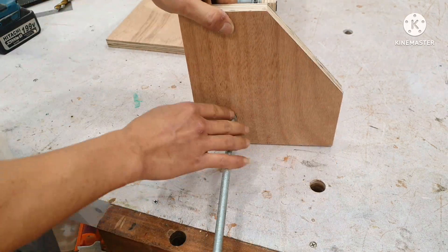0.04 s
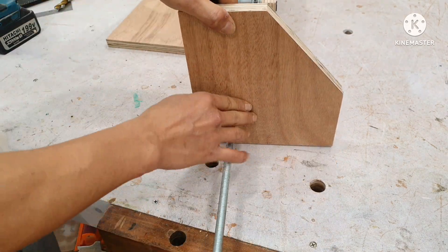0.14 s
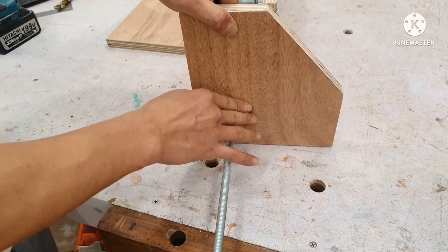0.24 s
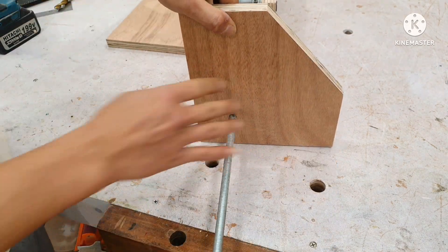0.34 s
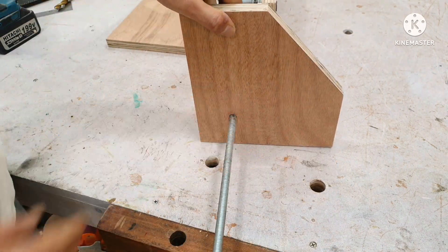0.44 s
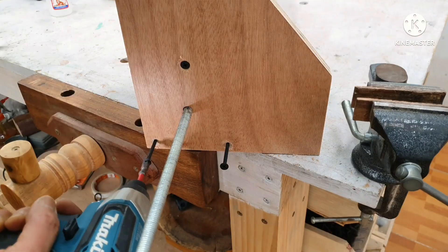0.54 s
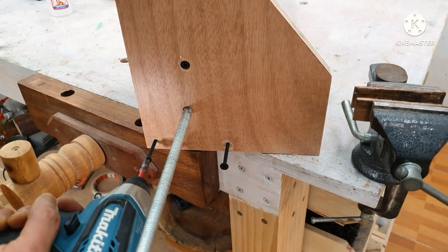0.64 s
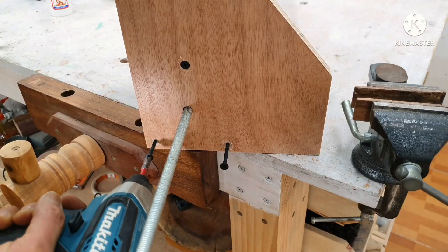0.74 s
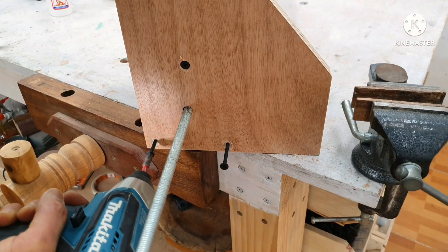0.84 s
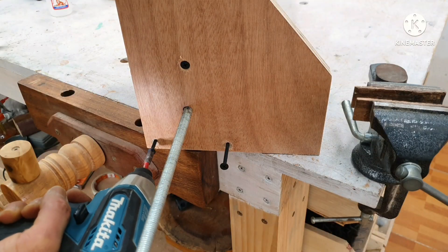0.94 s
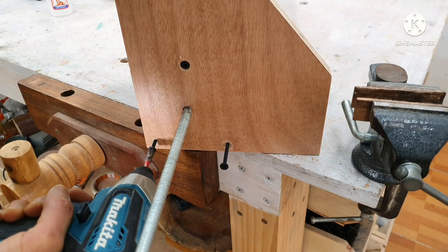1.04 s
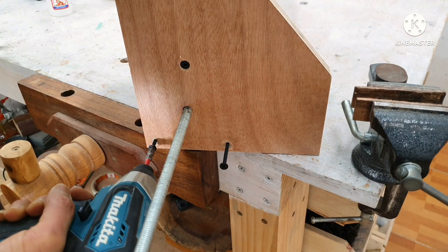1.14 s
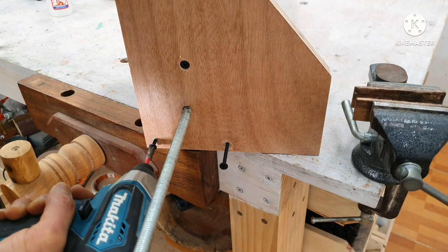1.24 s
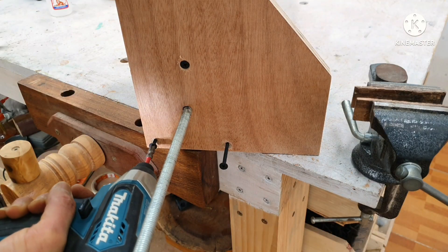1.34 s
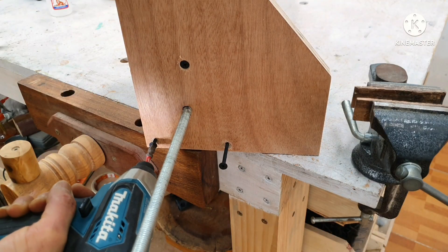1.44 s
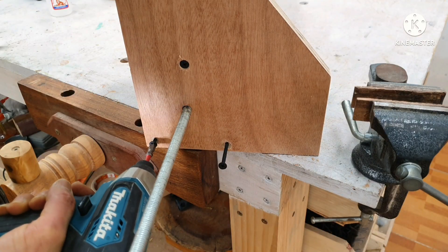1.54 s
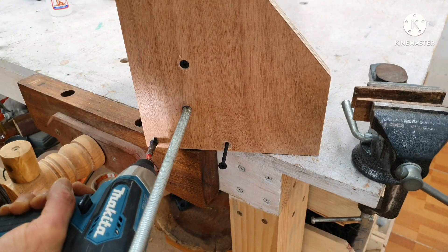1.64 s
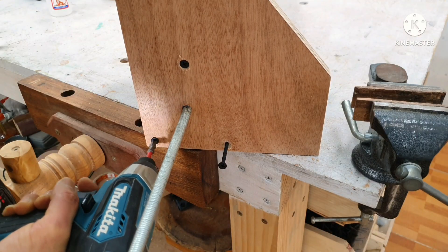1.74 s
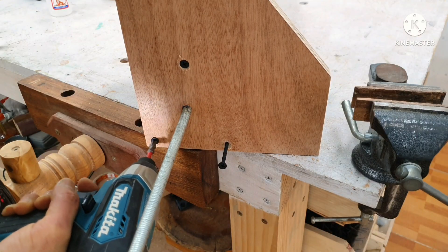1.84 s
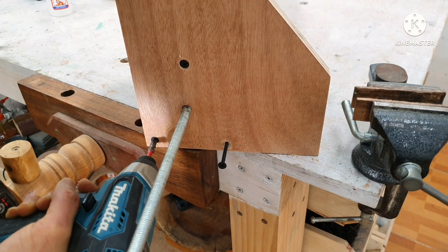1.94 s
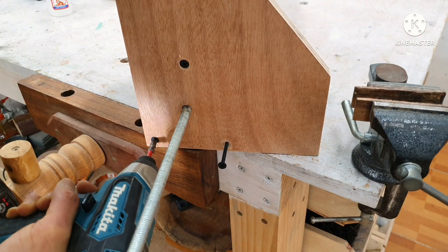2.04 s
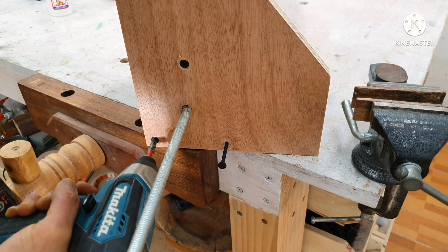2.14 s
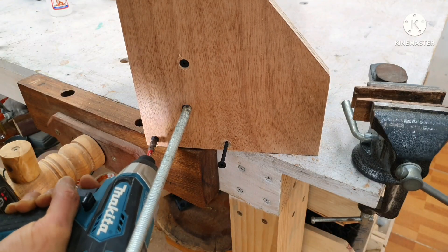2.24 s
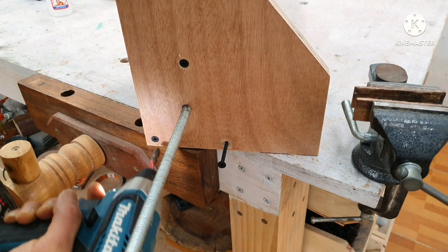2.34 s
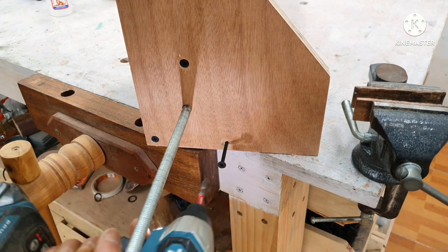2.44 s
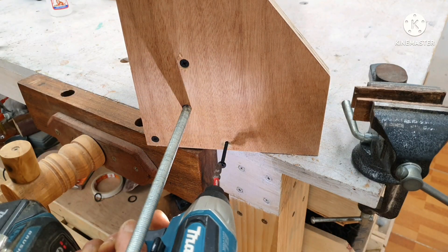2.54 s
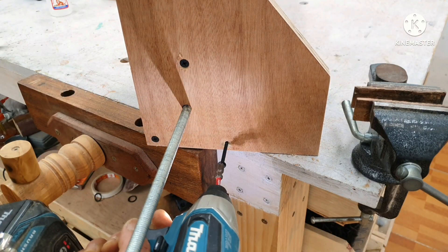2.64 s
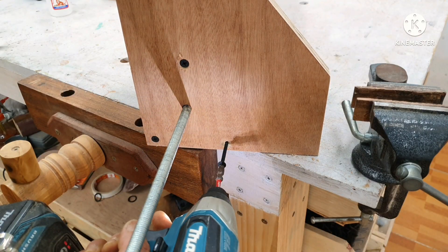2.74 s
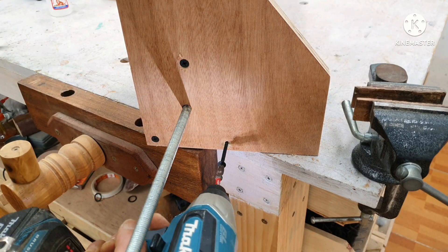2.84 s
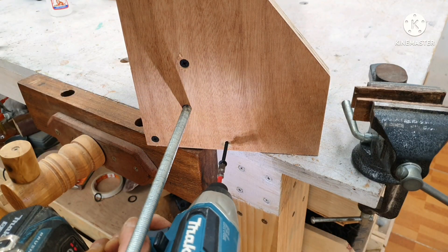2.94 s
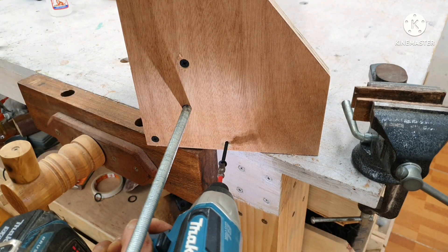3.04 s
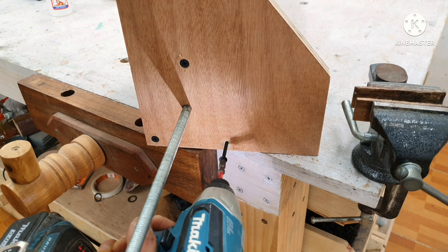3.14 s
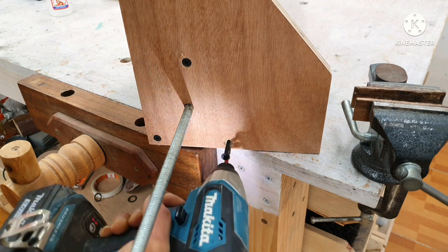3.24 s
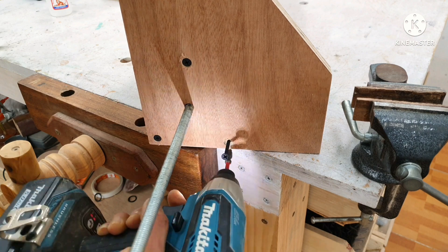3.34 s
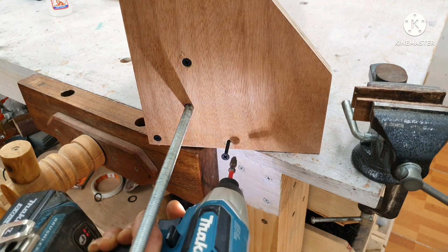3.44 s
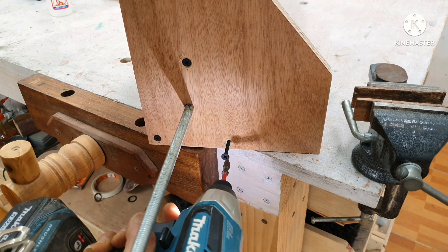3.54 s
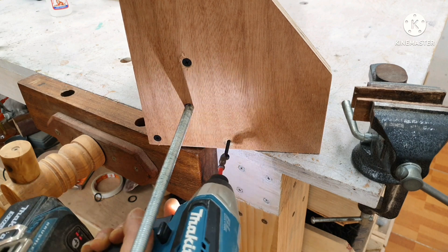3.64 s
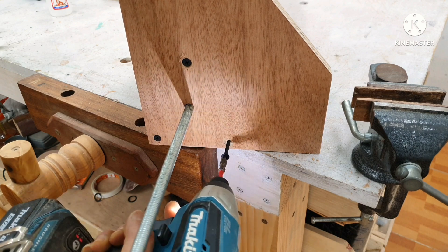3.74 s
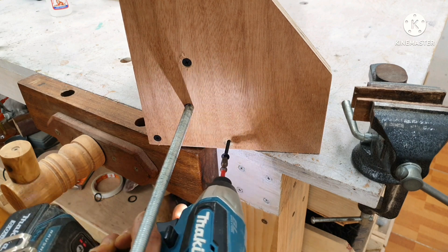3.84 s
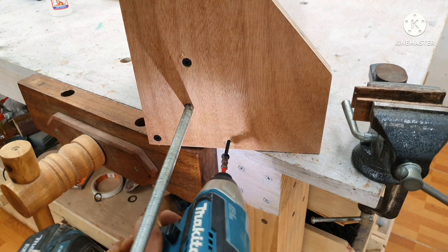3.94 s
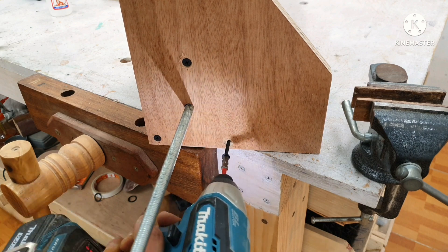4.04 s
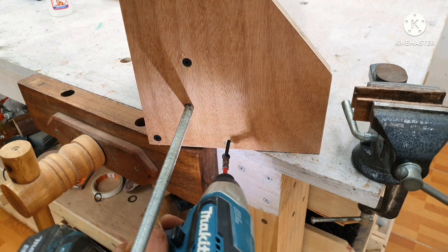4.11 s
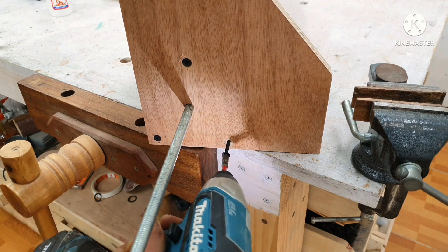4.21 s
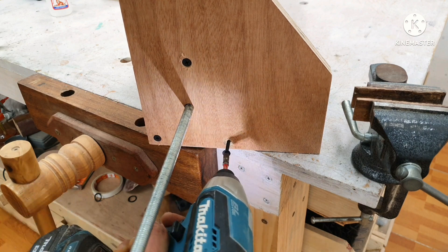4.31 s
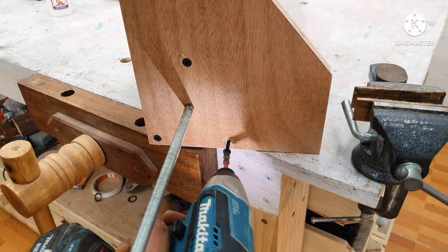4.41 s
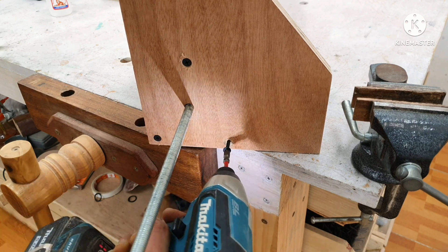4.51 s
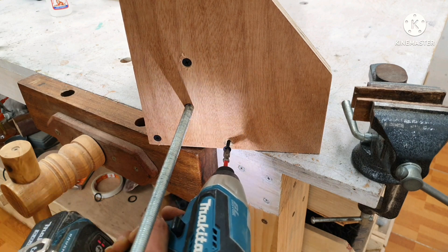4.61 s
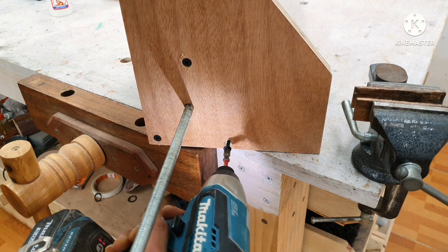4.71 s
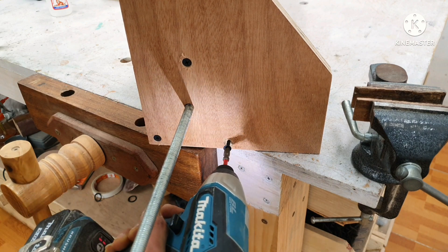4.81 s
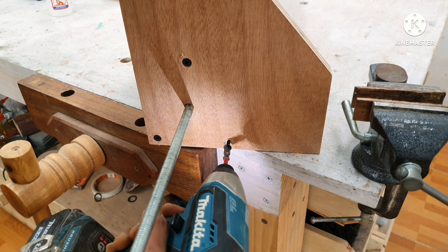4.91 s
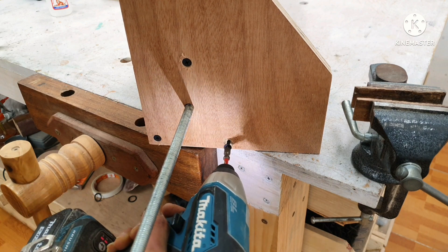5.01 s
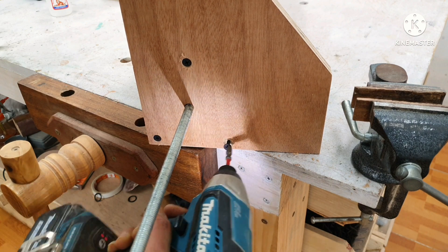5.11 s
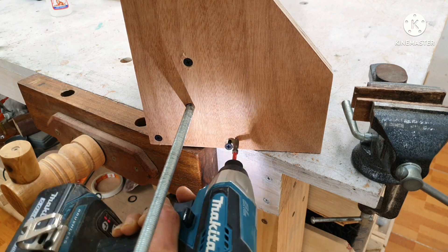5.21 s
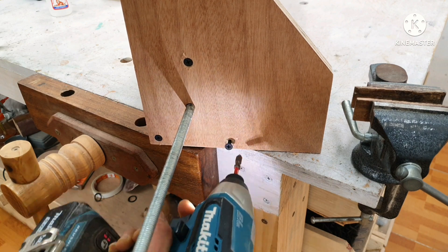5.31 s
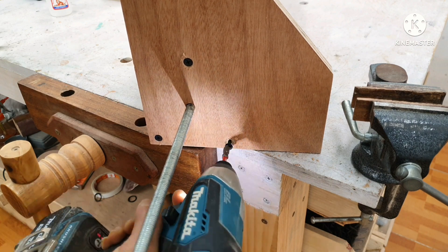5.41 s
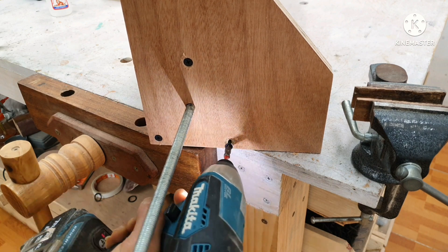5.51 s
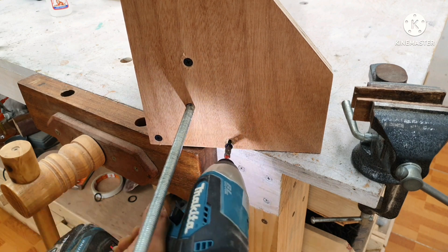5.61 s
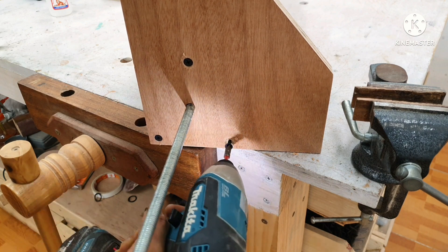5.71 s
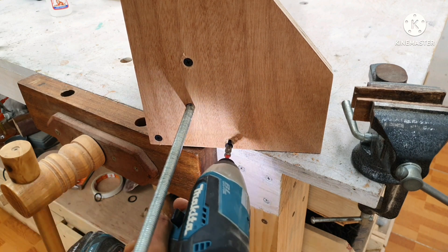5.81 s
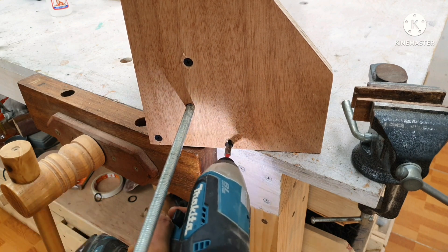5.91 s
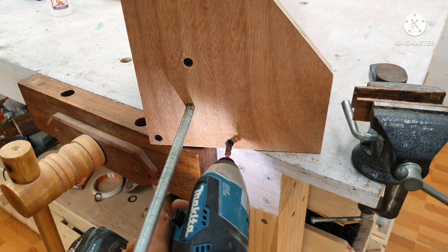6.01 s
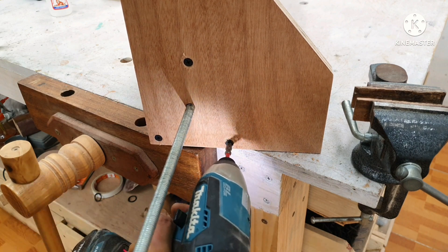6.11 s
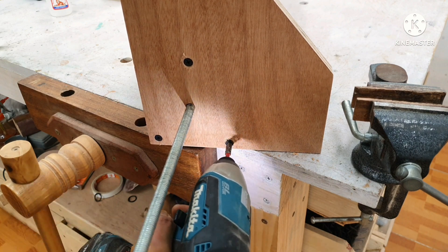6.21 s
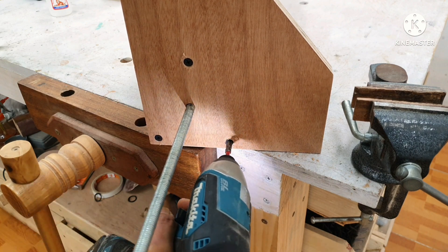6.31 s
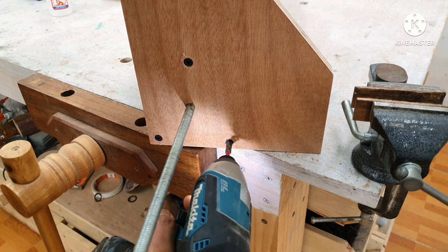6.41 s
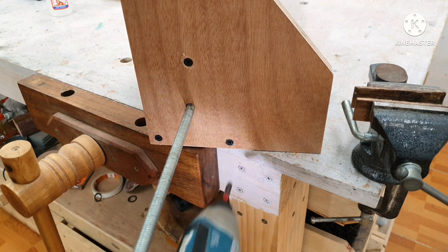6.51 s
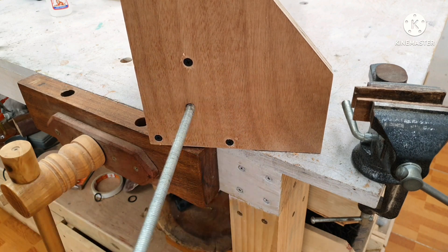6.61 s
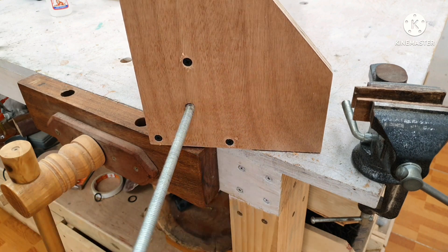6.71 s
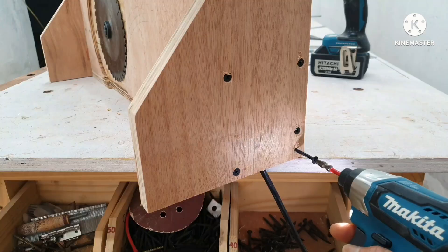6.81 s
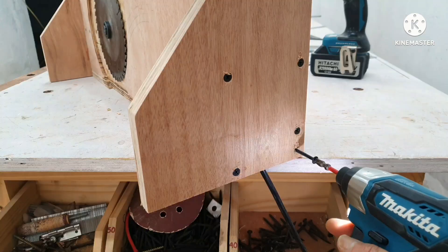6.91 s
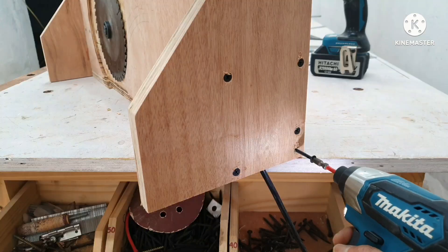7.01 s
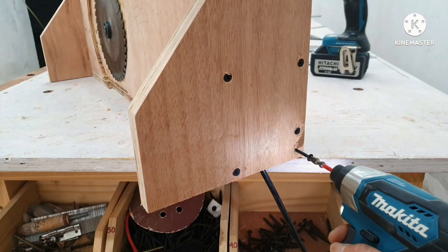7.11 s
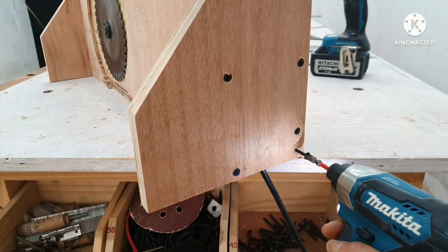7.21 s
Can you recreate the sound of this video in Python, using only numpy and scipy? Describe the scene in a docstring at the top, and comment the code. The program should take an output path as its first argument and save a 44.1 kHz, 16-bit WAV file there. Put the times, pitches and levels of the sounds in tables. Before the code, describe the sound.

Close up at a wooden bench, an impact driver sinks screws into plywood: gear whine first, then rapid machine-gun-like steel blows with buzzing board resonance. Pauses hold light ticks, scrapes and thin squeaks of the bit. Long burst, short ones, another long one, then short stabs, ending with two brief free-spinning whirs. A low engine idles and revs faintly outdoors in a small, lightly reverberant room.

```python
"""Impact driver in a small workshop

A cordless impact driver sinks screws into a plywood board on a bench: noise and gear-mesh partials make its
motor whir, then trains of decaying noise blows drive narrow tones, bit and board in long and short bursts.
The bit ticks on screw heads and knocks the board (short noise into resonators), scrapes and squeaks (shaped noise).
An engine outside idles and revs as sums of firing orders; the room adds a brief noise tail over faint room tone."""
import sys
import numpy as np
from scipy import signal
from scipy.fft import rfft, irfft
from scipy.io import wavfile

SR = 44100
rng = np.random.default_rng(int(sys.argv[2]) if len(sys.argv) > 2 else 0)


def wrap_up_sound(samples):
    """Save the sound to the file named by the first command line argument, as 16-bit audio."""
    columns = np.atleast_2d(samples).T
    # keep every value between -1 and 1, then stretch to whole-number steps
    tamed = np.clip(columns, -1, 1)
    steps = np.round(tamed * 32767).astype(np.int16)
    wavfile.write(sys.argv[1], SR, steps)


N = 320166


def gain_of(db):
    """Decibel law: 20 dB is a factor of ten in amplitude."""
    return 10 ** (np.asarray(db) / 20)


def evened(x):
    """Normalization: scales the whole signal to unit RMS."""
    return x / np.sqrt(np.mean(x ** 2) + 1e-20)


def curve(points):
    """Linear interpolation in time of (s, value) points."""
    return np.interp(np.arange(N) / SR, *np.transpose(points))


def read(points, hz):
    """Interpolation of (Hz, value) points on a logarithmic frequency scale."""
    f, value = np.transpose(points)
    return np.interp(np.log(hz + 1), np.log(f + 1), value)


def coloured(x, points):
    """Linear filtering: multiplies the spectrum by a gain curve in dB."""
    hz = np.fft.rfftfreq(x.shape[-1], 1 / SR)
    return irfft(rfft(x) * gain_of(read(points, hz)), x.shape[-1])


def lifted(x, lo_hz, hi_hz, lift_db):
    """Time-varying equalization: raises or lowers one band by a changing amount."""
    band = coloured(x, [(.7 * lo_hz, -30), (lo_hz, 0), (hi_hz, 0), (1.4 * hi_hz, -30)])
    return x + band * (gain_of(lift_db) - 1)


def stereo_pair(x):
    """Interchannel coherence: left and right are most alike around 300-600 Hz, less in deep bass, apart in treble."""
    # Each row: frequency in Hz, left-right likeness from 0 to 1.
    likeness = [(25, .4), (60, 0.18), (300, 0.96), (600, 0.91), (1200, 0.71), (2500, 0.13), (6000, .05),
                (12000, .01)]
    same = np.clip(read(likeness, np.fft.rfftfreq(x.shape[1], 1 / SR)), 0, 1)
    mid, side = rfft(x) * np.sqrt([1 + same, 1 - same]) / np.sqrt(2)
    return irfft(np.array([mid + side, mid - side]), x.shape[1])


def resonate(x, hz, width):
    """Resonance by heterodyning: shifts hz down to zero, smooths, and shifts back with a peak gain of 1."""
    turn = np.exp(2j * np.pi * np.cumsum(hz * np.ones(N)) / SR)
    r = np.exp(-np.pi * width / SR)
    return 2 * (turn * signal.lfilter([1 - r], [1, -r], x / turn)).real


def wander(seconds):
    """Slow random modulation: normal values, one per given time, joined by straight lines."""
    return np.interp(np.arange(N) / SR / seconds, np.arange(2500), rng.standard_normal(2500))


def swells(rows, width):
    """Narrow-band noise that swells and fades while its centre glides from one frequency to another."""
    out = np.zeros((2, N))
    for s, length, start_hz, end_hz, db in rows:
        u = np.clip((np.arange(N) / SR - s) / length, 0, 1)
        hz = start_hz + (end_hz - start_hz) * np.sqrt(u)
        envelope = np.sqrt(np.sin(np.pi * u ** 0.23) + 1e-12)
        narrow = resonate(rng.standard_normal((2, N)), hz, width)
        out += gain_of(db) * envelope * evened(resonate(narrow, hz, 2 * width))
    return stereo_pair(out)


def strokes(rows, up_db, down_db, down_s, down_share=0, fade=.003):
    """Envelopes that are linear in dB: rows rise, hold a slope and run down.

    Also returns the row that sounds, how far it has got and how far it has run down (both 0-1)."""
    t, gain = np.arange(N) / SR, np.zeros(N)
    start, _, length = np.transpose(rows)[:3]
    down = down_s + down_share * length
    for (s, rise, hold, first_db, last_db, *_), fall in zip(rows, down):
        times = [0, rise, hold, hold + fall]
        db = np.interp(t - s, times, [first_db + up_db, first_db, last_db, last_db + down_db])
        gain += gain_of(db) * np.clip(np.minimum(t - s, s + hold + fall - t) / fade, 0, 1)
    row = np.maximum(np.searchsorted(start, t) - 1, 0)
    since = t - start[row]
    along = np.clip(since / length[row], 0, 1)
    run_down = np.clip((since - length[row]) / down[row], 0, 1)
    return gain, row, along, run_down


def air():
    """Room tone as stationary noise with a fixed spectrum and a slowly changing level."""
    # Spectrum. Each row: frequency in Hz, relative density in dB per Hz.
    spectrum = [(20, -11), (60, -22), (120, 3.5), (200, 1.5), (300, -19), (500, -18), (1000, -20),
                (3000, -29), (8000, -32.5), (16500, -44.5)]
    # Each row: time in seconds, level in dB.
    level = [(0, -66.5), (.3, -75.5), (.58, -72), (.66, -91), (.75, -71), (2.501, -74.5), (4, -68.5),
             (5.5, -70), (6.7, -71), (7.0, -73.5), (7.26, -67.5)]
    return gain_of(curve(level)) * stereo_pair(evened(coloured(rng.standard_normal((2, N)), spectrum)))


def knocks(rise_s=0.00087, crack_s=0.00086, tail_db=-18, wood_db=-8, push_s=0.0021, thud_s=0.015):
    """Impact excitation: a steel crack with a rattle and a clean ping; a click and rough push ring board and bench."""
    # Bit striking screw or board, and the hardest hammer blows. Each row: start in seconds, steel crack in
    # relative dB, ping frequency in Hz, ping peak in dB, wood knock and low thud in relative dB.
    impacts = [(.0024, -66, 450, -51, -62, -43), (.196, -60, 3980, -69, -59, -56),
               (0.332, -80, 4000, -88, -67, -62), (0.5167, -70, 735, -38.5, -34.5, -55),
               (.528, -80, 4000, -90, -58, -58), (0.5444, -75, 4000, -82, -44.5, -56),
               (0.561, -80, 4000, -90, -51, -60), (0.579, -70, 4000, -90, -64, -78),
               (1.0773, -21.5, 5700, -29, -26, -40.5), (1.97, -24, 6550, -36, -40, -46),
               (2.218, -21, 5550, -37.5, -49, -49.5), (2.6748, -39.5, 4840, -36, -56, -81),
               (2.707, -56, 4550, -50, -67, -83), (2.7283, -59, 5610, -49, -72, -82.5),
               (2.756, -52, 4900, -50, -53, -83), (2.7719, -51, 5660, -48, -58, -71),
               (2.9727, -26.5, 4940, -32, -39, -55.5), (2.986, -19.5, 5700, -19.5, -35, -47.5),
               (3.255, -20.5, 2140, -33, -28, -48), (3.2783, -15.5, 5800, -20.5, -40.5, -54),
               (3.2974, -18.5, 6360, -22.5, -40.5, -50.5), (3.3052, -35.5, 2090, -23.5, -29.5, -31),
               (3.325, -43, 2480, -44, -38.5, -40), (3.374, -35, 6800, -41, -48, -52),
               (3.695, -49, 5900, -45.5, -68, -77), (3.7621, -44, 6460, -52, -73, -85),
               (3.788, -41.5, 7050, -46, -71, -69), (3.88, -40.5, 6440, -41, -47, -75),
               (3.9782, -41.5, 3250, -42, -37.5, -39.5), (4.0739, -56, 3360, -57.5, -73.5, -81.5),
               (4.111, -27.5, 3760, -36.5, -45, -76.5), (4.1586, -18, 3320, -24, -23, -49),
               (4.1757, -13, 6840, -21, -58, -60), (4.1802, -16, 3530, -35.5, -41, -40.5),
               (4.2728, -31, 7200, -39.5, -58, -72), (4.3424, -23, 7000, -24, -34, -39),
               (4.5306, -29, 6900, -22.5, -36, -58.5), (4.5657, -34, 6840, -26.5, -32, -53.5),
               (4.5835, -26, 7360, -29.5, -33.5, -48.5), (4.698, -21.5, 3580, -26.5, -27, -51),
               (4.778, -34, 6800, -26, -47, -46.5), (5.478, -28.5, 6540, -35.5, -49.5, -50),
               (5.7143, -59.5, 4100, -64, -63, -71.5), (5.7793, -24, 6700, -21.5, -28, -47.5),
               (5.791, -36.5, 2200, -24.5, -39, -41.5), (5.807, -27.5, 4000, -32.5, -42, -47.5),
               (5.82, -28, 6800, -26.5, -30.5, -41), (5.8555, -28, 3070, -30.5, -31.5, -39.5),
               (5.961, -26, 3070, -31, -42, -63), (5.9891, -37, 3170, -33, -47, -46),
               (6.02, -31, 4370, -28, -34, -44), (6.1429, -36, 3100, -31, -32, -44),
               (6.158, -40, 3430, -31, -33, -44), (6.3157, -23, 6640, -27, -33, -48),
               (6.323, -38, 2250, -29, -48, -44), (6.3757, -28, 1700, -26.5, -33, -39.5),
               (7.011, -52.5, 8800, -62, -66, -84), (7.0474, -29, 5560, -27.5, -49, -69.5),
               (7.1261, -25.5, 3170, -35, -43, -64), (7.206, -25, 8250, -34, -43.5, -50.5)]
    # Spectrum of the crack, then of its treble. Each row: frequency in Hz, relative gain in dB.
    tick_colour = [(1200, -24), (2200, -10.5), (4200, -5.5), (5700, -6.5), (7500, -4.5), (9000, -26.5)]
    tick_treble = [(6500, -35), (8500, 5.5), (12000, 0), (15500, -6.5)]
    # Modes of the plywood, then of the bench. Each row: frequency in Hz, width in Hz of the sharper of
    # two filters in series, relative gain in dB.
    board_modes = [(597, 45, 1), (716, 59, 1), (860, 77, -1), (963, 130, 3.5), (1066, 110, 4),
                   (1268, 90, -0.5), (1590, 86, 1), (1850, 330, -7.5), (2620, 400, -22.5)]
    bench_modes = [(238, 71, -3.5), (315.6, 44, 3), (384, 36, 1.5), (484, 22, -1), (601, 68, -2.5)]
    treble_db, tail_t60_s, ping_s = -12, 0.12, 0.00046  # the ping peaks ping_s after its start
    board_click_db, bench_click_db = 15.5, 24  # single-sample clicks, relative to knock and thud

    t = np.arange(6000) / SR
    blows = np.zeros((8, N + 6000))  # pairs of rows: crack, its treble, board, bench
    pings = np.zeros(N + 6000)
    tail = gain_of(-60 * t / tail_t60_s)
    ping_shape = t / ping_s * np.exp(1 - t / ping_s)
    for s, tick_db, ping_hz, ping_db, knock_db, thud_db in impacts:
        at = round(s * SR)
        pings[at:][:6000] += gain_of(ping_db) * ping_shape * np.sin(2 * np.pi * ping_hz * t)
        blows[[4, 6], at + 9] += gain_of([knock_db + board_click_db, thud_db + bench_click_db])
        parts = [(tick_db, crack_s, tail_db), (tick_db + treble_db, crack_s, tail_db),
                 (knock_db, push_s, wood_db), (thud_db, thud_s, wood_db)]
        shape = [gain_of(db) * (1 - np.exp(-t / rise_s)) * (np.exp(-t / short) + gain_of(rest_db) * tail)
                 for db, short, rest_db in parts]
        blows[:, at:][:, :6000] += np.repeat(shape, 2, axis=0) * rng.choice([-1., 1.], (8, 6000))
    crack, treble, push, thud = blows[:2, :N], blows[2:4, :N], blows[4:6, :N], blows[6:, :N]
    steel = gain_of(12.5) * coloured(crack, tick_colour) + gain_of(9.0) * coloured(treble, tick_treble)
    board = sum(gain_of(10.5 + db) * resonate(resonate(push, hz, width), hz, 3 * width)
                for hz, width, db in board_modes)
    bench = sum(gain_of(8.5 + db) * resonate(resonate(thud, hz, width), hz, 3 * width)
                for hz, width, db in bench_modes)
    return stereo_pair(steel + board + bench) + pings[:N]


def scrapes():
    """Friction noise: amplitude-modulated rubbing noise, narrow-band squeaks and falling swishes."""
    # Bit and hands sliding lightly on screw and wood. Each row: start, rise and length in seconds,
    # level at first and at last in dB before the lift, treble lift in dB.
    slides = [(0.44, .014, 0.064, -76, -77, 9), (2.676, 0.0037, 0.073, -71.5, -78, 15.5),
              (2.744, 0.017, 0.63, -78.5, -90, 4.5), (3.701, .004, 0.064, -76, -78, 12),
              (3.754, .008, 0.051, -64, -68.5, 10), (3.861, 0.013, 0.11, -54, -91, -2),
              (4.073, 0.037, 0.18, -61.5, -59, 7), (5.473, 0.005, 0.18, -56, -78, 1.5),
              (5.697, 0.032, 0.057, -79, -77.5, 9), (6.886, .02, 0.064, -78, -87, 4),
              (6.994, 0.043, 0.13, -75.5, -63, 5)]
    # Spectrum of the rubbing. Each row: frequency in Hz, relative density in dB per Hz.
    rub_colour = [(150, -34.5), (250, -6.5), (1080, -3.5), (1180, -2.5), (2360, -1), (2860, -11),
                  (6590, -9), (13200, -12), (16000, -34.5)]
    # Thin squeaks of the bit in a screw head. Each row: start and length in seconds, frequency in Hz,
    # level in dB before flicker.
    squeak_rows = [(0.448, 0.03, 2830, -70), (0.448, 0.06, 3400, -71), (2.7, 0.04, 1060, -70),
                   (2.738, .1, 1050, -64), (2.75, .05, 1550, -69), (2.903, 0.16, 1290, -80),
                   (3.31, 0.15, 2490, -54), (2.96, 0.036, 1750, -68), (3.74, 0.028, 1090, -70),
                   (3.866, 0.045, 1070, -65.5), (3.696, 0.18, 1065, -69.5), (3.718, 0.096, 2320, -57),
                   (6.907, 0.094, 1010, -76)]
    # Faint high swishes that fall in pitch. Each row: start and length in seconds, level in dB.
    swish_rows = [(5.532, 0.069, -71), (5.618, 0.14, -74), (6.718, 0.09, -73), (6.803, 0.085, -71)]
    from_hz, to_hz = 13500, 9000  # glide of the swishes

    gain, row, *_ = strokes(slides, up_db=-31, down_db=-8.5, down_s=0.018, fade=0.0039)
    *_, lift_db = np.transpose(slides)[:, row]
    rub = evened(coloured(rng.standard_normal((2, N)), rub_colour)) * gain_of(1.9 * wander(0.002))
    squeaks = swells([(s, length, hz, hz, db) for s, length, hz, db in squeak_rows], 120)
    squeaks = squeaks * gain_of(np.clip(4 * wander(0.027), -9, 4))
    swishes = swells([(s, length, from_hz, to_hz, db) for s, length, db in swish_rows], 1800)
    return gain * stereo_pair(lifted(rub, 3000, 6400, lift_db)) + squeaks + swishes


def motor(flicker_db=10):
    """Gear-mesh harmonics with weaker shaft lines between, brush hiss and housing modes; lines and modes flare singly."""
    # Motor turning freely. Each row: start, rise and length in seconds, level at first and at last in #
    # relative dB, gear whine in relative dB, treble snap of the start in dB.
    whirs = [(0.671, 0.086, 0.41, -45.5, -42.5, 1, 5), (3.107, 0.014, 0.14, -43, -43, 1.5, -22),
             (4.254, 0.0042, 0.084, -43, -40.5, -2.5, -5), (7.043, 0.0038, 0.073, -45.5, -43.5, -3, 31.5),
             (7.202, 0.0029, 0.079, -48.5, -43, -3.5, 40)]
    # Spectrum of the hiss. Each row: frequency in Hz, relative density in dB per Hz.
    hiss_colour = [(150, -55.5), (250, -31.5), (1390, -9), (2120, -11), (2480, -20.5), (2860, -1),
                   (5280, -6), (6520, -1), (14600, -6.5), (15700, -12.5), (16500, -70)]
    # Tool housing tones. Each row: frequency in Hz, width in Hz, relative level in dB.
    housing = [(4300, 90, -10.5), (6350, 90, 4), (6600, 83, -7), (6850, 74, 14.5), (7530, 27, 13),
               (9440, 100, -20), (11200, 65, -1)]
    # Spectrum of the gear whine. Each row: frequency in Hz, relative level in dB.
    mesh_colour = [(500, -24.5), (700, -2.5), (950, -3.5), (1150, 0.5), (1400, -2.5), (1850, -9.5),
                   (2300, -8), (2800, -0.5), (3500, -2), (4300, -4), (5500, -3.5), (7100, 6), (9000, -8.5),
                   (12000, -15.5)]
    # Gear mesh before slip. Each row: time in seconds, mesh frequency in Hz.
    mesh_rate = [(.7, 699), (.78, 739), (.825, 676.6), (.9, 696.6), (.975, 754.5), (1.02, 693), (1.05, 674),
                 (3.11, 1051), (3.15, 1088), (3.17, 1124), (3.187, 1239), (3.21, 1172), (3.25, 1206),
                 (4.25, 1054), (4.34, 1111), (7.04, 926), (7.075, 967), (7.115, 1005), (7.13, 1018),
                 (7.2, 851), (7.26, 949)]
    # Each row: time in seconds, added level of the gear whine in dB.
    whine_level = [(.7, -0.5), (.8, -6.5), (.83, 5), (.87, -4.5), (.95, -1.5), (1.0, -6.5), (1.045, 1),
                   (3.12, -10.5), (3.148, 8), (3.19, -1.5), (3.205, -7), (3.215, 7), (3.25, 3.5),
                   (4.25, -0.5), (4.34, 1), (7.04, -3.5), (7.09, 1.5), (7.26, 1)]
    shaft_line_db, tones_db, snap_s = -10, -3.5, 0.009

    gain, row, along, _ = strokes(whirs, up_db=-33.5, down_db=-33.5, down_s=0.013, fade=.0015)
    *_, mesh_db, snap_db = np.transpose(whirs)[:, row]
    since_start = along * np.transpose(whirs)[2, row]
    treble_db = snap_db * np.exp(-since_start / snap_s)
    drive, mesh_hz = rng.standard_normal((2, N)), curve(mesh_rate)
    # the mesh slips, partly apart in the two channels
    slip = 0.0035 * np.array([wander(.004), wander(0.0044)]) + .004 * wander(.02)
    turns = np.cumsum(mesh_hz * (1 + slip), axis=1) / SR
    mesh = 0
    for k in np.arange(4, 49) / 4:  # whole multiples are mesh harmonics, the quarters between are shaft lines
        flicker = np.clip(flicker_db * wander(.025), -9, 4)
        line_db = read(mesh_colour, k * mesh_hz) + shaft_line_db * (k % 1 > 0) + flicker
        mesh = mesh + gain_of(line_db) * np.cos(2 * np.pi * (k * turns + rng.random()))
    tones = sum(gain_of(db + np.clip(7 * wander(0.015), -12, 6)) * evened(resonate(drive, hz, width))
                for hz, width, db in housing)
    hiss = evened(coloured(drive[::-1], hiss_colour)) * gain_of(2.8 * wander(0.0059))
    whine = gain_of(mesh_db + curve(whine_level)) * evened(mesh)
    whir = evened(hiss + whine + gain_of(tones_db) * evened(tones))
    return gain * stereo_pair(lifted(whir, 8300, 16000, treble_db))


def engine():
    """Order synthesis: idling orders beat against a half order; revved, whole orders glide through the walls' passband."""
    # Engine outside. Each row: time in seconds, relative level in dB.
    level = [(.68, -88), (.76, -56), (1.05, -54.5), (1.4, -66), (2.0, -69.5), (2.4, -63.5), (2.8, -57),
             (3.55, -57.5), (3.75, -56), (4.05, -66), (4.6, -59), (4.9, -59.5), (5.2, -76.5), (5.5, -55),
             (6.0, -73), (6.3, -66), (6.6, -65), (6.9, -67), (7.05, -102)]
    # Each row: time in seconds, firings per second.
    firing = [(.7, 16.4), (2.4, 16.4), (3.5, 16.6), (3.75, 18), (4.05, 18.9), (4.35, 17.9), (4.6, 17.7),
              (4.95, 18.8), (5.3, 20.4), (5.55, 20.5), (5.8, 19.6), (6.1, 18.4), (6.3, 18.1), (6.6, 18.6),
              (6.9, 19.1)]
    # Each row: multiple of the firing rate, relative level in dB.
    idle_orders = [(4, -17), (7, -18), (7.5, 0), (8, -4), (8.5, -14), (9, -16), (10, -12)]
    # What the walls let through. Each row: frequency in Hz, relative gain in dB.
    walls = [(60, -27.5), (75, -34.5), (90, -28), (112, -37.5), (123, -7.5), (132, 3), (143, -7),
             (150, -4.5), (166, 2), (180, -36.5), (200, -36)]
    idle_below, revved_above = 16.34, 18.6  # firings per s; the two blend between
    throb_lag_s = .045  # delays the throb, at the first firing rate

    gain, rate = gain_of(curve(level)), curve(firing)
    idle = np.clip((revved_above - rate) / (revved_above - idle_below), 0, 1)
    turns = np.cumsum(rate) / SR - throb_lag_s * rate[0]
    idling = sum(gain_of(db + 2.1 * wander(0.11)) * np.cos(2 * np.pi * k * turns) for k, db in idle_orders)
    revved = 0
    for k in range(3, 12):
        order_db = read(walls, k * rate) + np.clip(2.7 * wander(0.13), -3, 3)
        revved = revved + gain_of(order_db) * np.cos(2 * np.pi * k * turns)
    return gain * (idle * idling + (1 - idle) * revved)


def hammer(jitter=.02, blow_s=0.014, spread_db=4.0, thump_db=-17):
    """Periodic impacts: bursts of steel noise over gear rattle drive narrow tones, bit and board; harmonics thump."""
    # Hammering, one row a squeeze. Each row: start, spin-up and length in seconds, level at first and at last
    # in relative dB, blow strength and narrow tones in relative dB, treble, board and thump lift in dB.
    bursts = [(1.076, 0.006, 0.73, -33.5, -37.5, -7.5, -20, 1.5, -2.5, -8),
              (1.938, 0.018, 0.12, -35.5, -40.5, -5.5, -22, 3.5, -0.1, -3),
              (2.12, 0.013, 0.2, -37, -38, -4, -15.5, 3, 0, 0),
              (3.247, 0.0062, 0.074, -36, -37.5, -9.5, -12.5, 1, 1.5, -2.5),
              (4.332, 0.013, 0.85, -33, -34, -2.5, -9, 1, -1.5, -1.5),
              (5.755, 0.015, 0.12, -30.5, -33, -3, -10, -0.2, -3.5, -4),
              (5.947, 0.0076, 0.081, -36.5, -34.5, -1.5, -14.5, 2.3, -2, -3),
              (6.12, 0.023, 0.087, -35, -33.5, -3.5, -10.5, 1, -1, 0),
              (6.3, 0.01, 0.084, -34, -35.5, -4, -12, 2.7, -2, -14)]
    # Each row: time in seconds, blows per second before jitter.
    blow_rate = [(1.07, 57), (1.35, 61.5), (1.5, 61), (1.65, 58.5), (2.0, 58), (2.3, 60), (4.34, 50),
                 (4.5, 54), (4.65, 60), (4.75, 64), (5.0, 65), (5.04, 72), (5.17, 79), (5.25, 79),
                 (5.75, 80), (5.85, 84), (5.92, 78), (6.03, 79), (6.2, 75), (6.4, 72)]
    # Spectrum of the steel noise. Each row: frequency in Hz, relative density in dB per Hz.
    steel_colour = [(88, -47.5), (150, -31.5), (186, -16), (260, -23), (311, -8.5), (363, -22.5), (450, -6),
                    (630, -8.5), (767, -5), (1090, -1), (1470, 0), (3420, 0.5), (15000, -5), (16500, -43.5)]
    # Bass of the blows. Each row: frequency in Hz, relative level in dB.
    thump_colour = [(110, -12.5), (190, 8), (240, -1), (320, 0), (450, -7.5), (640, 8), (800, -9.5)]
    # Narrow tones colouring the hammering, before wander. Each row: frequency in Hz, width in Hz,
    # relative level in dB.
    narrow_tones = [(912, 47, -0.5), (1800, 150, 6), (2140, 110, 3.5), (3370, 120, 1), (3554, 90, -4.5),
                    (4500, 58, -7), (5760, 67, 0.5), (6250, 88, 3), (6740, 92, 10.5), (7300, 100, 3),
                    (7770, 60, 0), (8590, 60, -7)]
    # Free corner of the board under the first screw. Each row: frequency in Hz, width in Hz, relative level in dB.
    corner_modes = [(317, 25, -12), (427, 15, -12), (635, 17, 1), (720, 19, -4), (820, 65, 6.5),
                    (887, 15, 6.5), (1150, 70, 1), (1330, 70, 3), (1960, 90, 0)]
    # Level of that corner, then hum of the long bit. Each row: time in seconds, relative level in dB.
    corner_ring = [(1.07, -2.5), (1.25, -8), (1.45, -10.5), (1.55, -14), (1.8, -24.5), (2.3, -10.5),
                   (2.6, -35)]
    bit_ring = [(1.07, -32), (1.8, -22.5), (2.3, -29), (3.25, -20), (4.34, -11.5), (4.45, -21),
                (4.6, -20.5), (4.9, -21), (5.15, -22.5), (5.8, -32), (6.0, -19), (6.15, -8), (6.35, -24)]
    # Lift of the middle band, then swell of the two long bursts. Each row: time in seconds, gain in dB.
    middle = [(1.07, -4), (1.6, -2), (1.7, -10), (1.85, -4.5), (1.95, -2.5), (4.35, -2.5), (5.2, -1),
              (6.4, 0)]
    bite = [(1.1, 0.5), (1.443, 0.7), (1.465, 4.5), (1.8, -0.03), (4.35, 0.5), (4.486, -6), (4.806, 0.16),
            (5.16, -1.14)]
    bit_hz, bit_width_hz = 1092, 74
    crack_db, crack_s = 9, .0009  # sharp front of each blow
    dull_db, down_thump_db = -4.5, 13  # running down, it turns dull and thumps

    # the longer the burst, the longer it runs down
    gain, row, _, down = strokes(bursts, up_db=-24.5, down_db=-14.5, down_s=.016, down_share=0.055, fade=0.002)
    *_, blow_db, tones_db, treble_db, board_db, lift_db = np.transpose(bursts)[:, row]
    treble_db = treble_db + dull_db * down
    lift_db = lift_db + down_thump_db * down

    rate = curve(blow_rate)
    turns = np.cumsum(rate * (1 + jitter * wander(0.02))) / SR
    sizes = gain_of(spread_db * np.clip(rng.standard_normal(1000), -2, 1.3))
    size = sizes[turns.astype(int) % 1000]
    since = (turns % 1) / rate
    blows = size * (np.exp(-since / blow_s) + gain_of(crack_db) * np.exp(-since / crack_s))
    # rough grain: a new random gain every 40 samples
    grain = gain_of(1.9 * rng.standard_normal((2, N // 40 + 1))).repeat(40, axis=1)[:, :N]
    drive = (1 + gain_of(blow_db) * blows) * grain * rng.standard_normal((2, N))

    tones = 0
    for hz, width, db in narrow_tones:  # each tone gets its own random wander in level and pitch
        tone_gain = gain_of(db + np.clip(7 * wander(0.02), -12, 6))
        tones = tones + tone_gain * resonate(drive, hz * (1 + 0.008 * wander(.04)), width)

    steady = np.cumsum(rate) / SR  # the bass of the blows keeps time and sounds as lines
    thump = 0
    for k in range(2, 12):
        line_db = read(thump_colour, k * rate) + np.clip(9.8 * wander(0.14), -4, 4)
        thump = thump + gain_of(line_db) * np.cos(2 * np.pi * (k * steady + rng.random()))

    steel = evened(evened(coloured(drive, steel_colour)) + gain_of(tones_db) * evened(tones))
    bit = resonate(resonate(drive, bit_hz, bit_width_hz), bit_hz, 4 * bit_width_hz)
    steel = steel + gain_of(curve(bit_ring)) * evened(bit)
    corner = sum(gain_of(db + np.clip(6 * wander(0.054), -10, 5)) * evened(resonate(drive, hz, width))
                 for hz, width, db in corner_modes)
    steel = steel + gain_of(curve(corner_ring)) * evened(corner)
    steel = lifted(steel, 1300, 2200, curve(middle))
    steel = lifted(steel, 9700, 16000, treble_db)
    steel = lifted(steel, 550, 1300, board_db)
    low = gain_of(thump_db + lift_db) * evened(thump)
    return gain * gain_of(curve(bite)) * (stereo_pair(steel) + low)


def room(x):
    """Diffuse reverberation: convolution with a noise tail from 6 ms on, each band dying at its own speed."""
    # Each row: frequency in Hz, reverberation time (60 dB decay) in seconds.
    decay = [(150, 0.45), (600, 0.36), (2000, 0.29), (6000, 0.27), (14000, 0.24)]
    hz, t, z = signal.stft(stereo_pair(rng.standard_normal((2, SR // 2))), SR, nperseg=256)
    tail = signal.istft(z * gain_of(-60 * t / read(decay, hz)[:, None]), SR, nperseg=256)[1]
    tail = np.pad(tail, ((0, 0), (260, 0)))
    return signal.fftconvolve(x, tail / np.linalg.norm(tail[0]), axes=1)[:, :N]


def scene():
    """Superposition: tool and taps each with their reverberation, plus engine and room tone."""
    tool = hammer() + gain_of(0.5) * motor()
    taps = knocks() + scrapes()
    return tool + gain_of(-3.5) * room(tool) + taps + gain_of(-9.5) * room(taps) + engine() + air()


def record(dry):
    """Band limiting: a linear-phase low-pass filter."""
    edge_hz = 16300
    low_pass = signal.firwin(255, edge_hz, window=("kaiser", 9), fs=SR)
    return signal.oaconvolve(dry, low_pass[None], "same")


dry = scene()
out = record(dry)
wrap_up_sound(out)
```